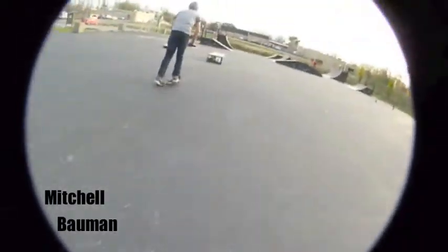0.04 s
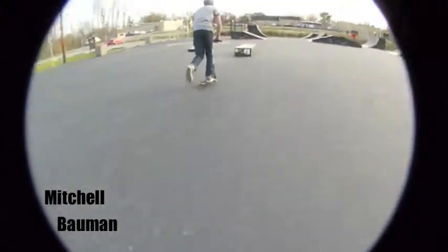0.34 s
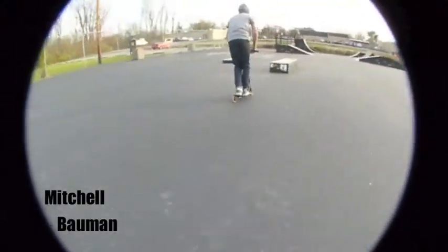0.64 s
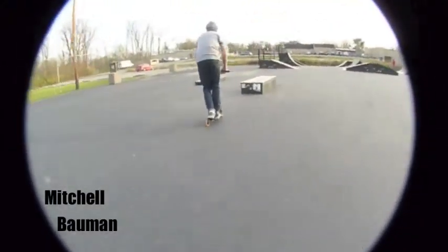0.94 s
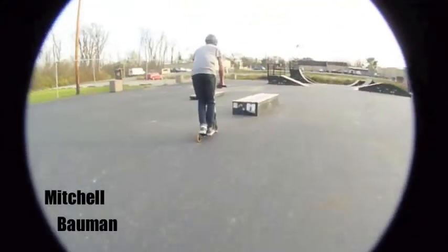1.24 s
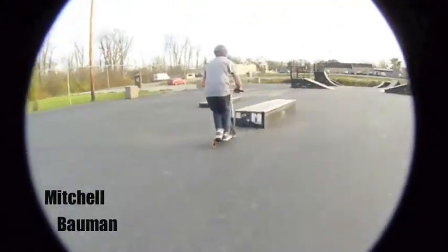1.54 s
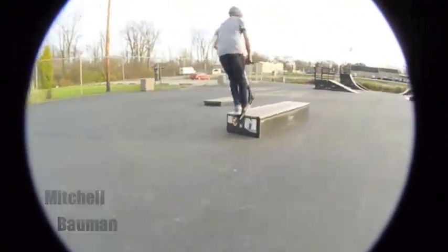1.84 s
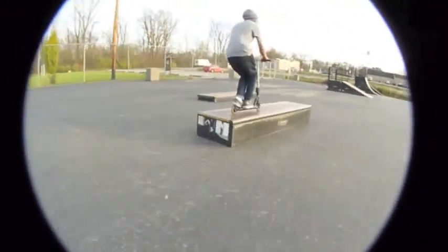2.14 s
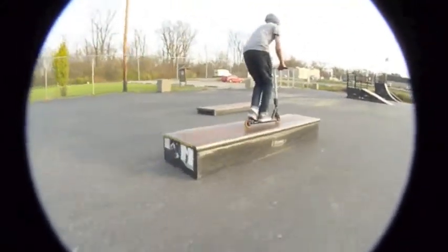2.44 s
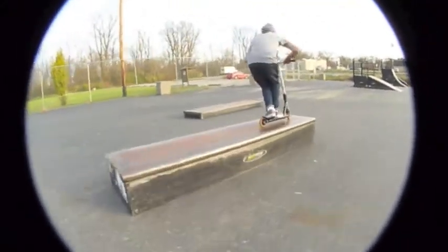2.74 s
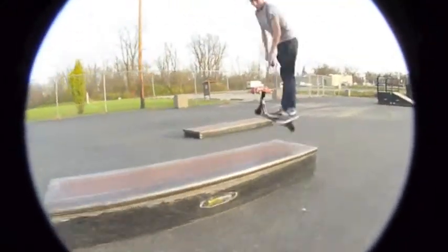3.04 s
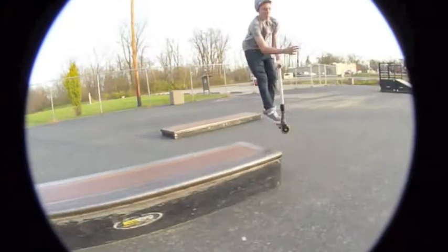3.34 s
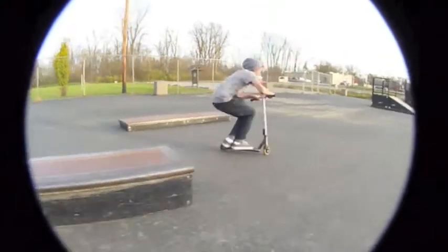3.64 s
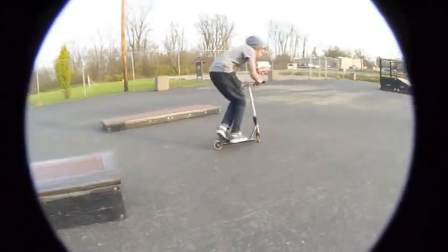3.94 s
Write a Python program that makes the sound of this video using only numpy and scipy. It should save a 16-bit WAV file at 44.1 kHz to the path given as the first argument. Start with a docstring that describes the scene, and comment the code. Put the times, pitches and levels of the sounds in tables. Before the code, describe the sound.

A stunt scooter rolls over rough pavement outdoors, with a brief scuff at the start and wheels roaring and humming close to the microphone. At about 2.1 seconds it clacks onto a hollow ledge with a metallic clang and a boom, then rattles and ticks along it, squeaking faintly near 2.9. It lands with a double clack at 3.5 seconds. Wind buffeting grows as the wheel roar fades.

```python
"""A stunt scooter rolls over a skatepark, hops onto a hollow ledge, rides along it and lands on the
ground with a double clack. Deck and frame clang at each contact, loose parts rattle, tick and squeak,
and the ledge booms under the rider's weight. The microphone rolls along behind, probably on a
skateboard: wheels close to it roar and hum on the rough surface, and wind buffets its two ports
more and more."""
import sys
import numpy as np
from scipy import signal
from scipy.fft import rfft, irfft
from scipy.io import wavfile

SR = 44100
rng = np.random.default_rng(int(sys.argv[2]) if len(sys.argv) > 2 else 0)


def unload_audio(sound):
    """Save the sound as a 16-bit wav file, at the path given as the first command line argument."""
    columns = np.transpose(np.atleast_2d(sound))
    # keep every value between -1 and 1, then stretch to whole-number steps
    steps = np.round(np.clip(columns, -1, 1) * 32767)
    wavfile.write(sys.argv[1], SR, steps.astype(np.int16))


N = 176400
TIME = np.arange(N) / SR
CUTOFF_HZ = 8300
HIT_LIKENESS, CRACK_T60_S = 0.75, 0.017


def from_db(db):
    """Decibels to gain."""
    return 10 ** (np.asarray(db) / 20)


def rms_one(x):
    """Scale to rms 1."""
    return x / np.sqrt(np.mean(x ** 2) + 1e-20)


def in_time(rows):
    """Each column of a curve, at every sample."""
    times_s, *columns = np.transpose(rows)
    return [np.interp(TIME, times_s, column) for column in columns]


def panned(pan_db):
    """Constant-power gains; pan is left minus right."""
    gains = from_db(np.array([[.5], [-.5]]) * pan_db)
    return gains / np.sqrt(np.mean(gains ** 2, axis=0))


def drift(rate_hz):
    """Low-passed noise; rms 1."""
    pole = np.exp(-2 * np.pi * rate_hz / SR)
    return rms_one(signal.lfilter([1], [1, -2 * pole, pole * pole], rng.standard_normal(N + SR))[SR:])


def flicker(rate_hz, depth_db):
    """A random gain; rms 1."""
    return rms_one(from_db(depth_db * np.clip(drift(rate_hz), -2, 2)))


def noise(colour, likeness, source=None):
    """Coloured stereo noise, rms 1; likeness is left-right correlation, one value or (bass, treble)."""
    hz, db = np.transpose(colour)
    f = np.maximum(np.fft.rfftfreq(N, 1 / SR), 1)
    gain = from_db(np.interp(np.log(f), np.log(hz), db)) * f ** 2 / (f ** 2 + (hz[0] / 2) ** 2)
    source = rng.standard_normal((2, N)) if source is None else source
    mid, side = rfft(source) * gain * (f < CUTOFF_HZ)
    alike = np.interp(np.log(f), np.log([100, 1000]), np.broadcast_to(likeness, 2))
    return rms_one(irfft(np.sqrt(1 + alike) * mid + np.sqrt(1 - alike) * side * [[1], [-1]], N))


def resonance(hz, width_hz):
    """A narrow noise band: a mode kept ringing by friction; rms 1."""
    phase = 2 * np.pi * np.cumsum(hz * np.ones(N)) / SR
    return rms_one(drift(width_hz) * np.cos(phase) + drift(width_hz) * np.sin(phase))


def decay(t60_s):
    """Half a second of exponential decay."""
    return from_db(-60 * TIME[:SR // 2] / t60_s)


def ring(hz, t60_s):
    """One struck mode."""
    return np.sin(2 * np.pi * hz * TIME[:SR // 2]) * decay(t60_s)


def place(events):
    """Sum (start, level, pan, sound) events into a stereo track."""
    out = np.zeros((2, N + SR))
    for start_s, db, pan_db, sound in events:
        i = int(start_s * SR)
        out[:, i:i + len(sound)] += from_db(db) * panned(pan_db) * sound
    return out[:, :N]


def park_scatter(sound, level_db=-13.5):
    """Faint reflections from the ground and the ramps."""
    tail = rng.standard_normal((2, SR // 2)) * decay(t60_s=0.16)
    tail /= np.sqrt(np.sum(tail ** 2, axis=1, keepdims=True))
    return from_db(level_db) * signal.fftconvolve(sound, tail, axes=1)[:, :N]


# Each row: time in seconds, relative level in dB, pan in dB.
RUMBLE = [(0, -32, -8), (.3, -43, -1.5), (.7, -38, 0), (.95, -33.5, 0.5), (1.2, -32.5, -5.5),
          (1.55, -34, -3), (1.82, -34.5, -8.5), (1.95, -28.5, -7.5), (2.1, -36, -2.5), (2.35, -26.5, -9),
          (2.6, -30.5, -18), (2.75, -27.5, -6), (2.92, -27, -5), (3.1, -28.5, -2), (3.25, -31.5, 11),
          (3.4, -27, 2.5), (3.57, -35.5, 4.5), (3.7, -28, 4.5), (4, -33, 4)]
# Each row: frequency in Hz, relative density in dB.
RUMBLE_COLOUR = [(20, -13), (35, -2), (60, 4.5), (100, 6), (150, 4), (250, -2.5), (600, -62)]


def wind_rumble(gain_db=1):
    """Wind makes a deep, lumpy rumble."""
    level_db, pan_db = in_time(RUMBLE)
    rumble = noise(RUMBLE_COLOUR, likeness=0.45) * flicker(25, depth_db=2.5)
    return from_db(level_db + gain_db) * panned(pan_db) * rumble


# Each row: time in seconds, relative level in dB, pan in dB.
BUFFET = [(0, -31.5, -9), (.1, -57, -2), (.3, -74, -2), (.65, -45.5, -2), (.78, -37.5, -3.5),
          (1.1, -40, -7.5), (1.6, -34, -7), (1.85, -39, -4), (2.3, -34.5, -6), (2.45, -26, -5.5),
          (2.6, -34, -4.5), (3.07, -30, -4), (3.14, -23, -5), (3.2, -24.5, 3), (3.26, -25.5, 2),
          (3.37, -24.5, 1.5), (3.51, -22.5, 2.5), (3.56, -32.5, 8), (3.61, -27, 2.5), (3.67, -25, 6),
          (3.73, -24.5, 1), (3.82, -22, -0.5), (3.89, -27, 2), (4, -21.5, -0.5)]
# Each row: frequency in Hz, relative density in dB.
BUFFET_COLOUR = [(60, -17.5), (130, -6), (190, -1.5), (280, -2.5), (450, -6), (700, -14), (1000, -20.5),
                 (1600, -28), (2400, -39.5), (4000, -51.5), (7500, -78)]


def wind_buffeting(gain_db=2, pops_per_s=500, pop_spread_db=5, pop_share=0.49):
    """Turbulence: uneven pops on smooth noise, with separate eddies at each port."""
    level_db, pan_db = in_time(BUFFET)
    eddies = np.array([flicker(25, depth_db=2.4) for port in range(2)])
    sizes = from_db(pop_spread_db * np.minimum(rng.exponential(1, (2, N)), 3.5))
    signs = rng.choice([-1, 1], (2, N))
    pops = rms_one(sizes * signs * (rng.random((2, N)) < pops_per_s / SR))
    turbulence = np.sqrt(pop_share) * pops + np.sqrt(1 - pop_share) * rng.standard_normal((2, N))
    buffet = noise(BUFFET_COLOUR, likeness=(0.71, -0.3), source=turbulence)
    return from_db(level_db + gain_db) * panned(pan_db) * buffet * eddies


# Each row: start in seconds, level in dB, pan in dB.
BUMPS = [(1.574, -10.5, -12), (1.616, -12, -11), (1.719, -10.5, -12), (2.858, -10.5, -8), (3.1413, -6, 5),
         (3.173, -9.5, -22), (3.302, -8.5, 19), (3.482, -15.5, 17), (3.752, -15, -6.5), (3.847, -12.5, 1),
         (3.875, -10, 16)]


def wind_bumps():
    """Single gusts bump the ports."""
    return place((s, db, pan, ring(hz=248, t60_s=0.025)) for s, db, pan in BUMPS)


# Each row: time in seconds, relative level in dB.
ROAR = [(0, -38), (.3, -37), (.9, -36.5), (1.2, -37), (1.42, -38), (1.7, -38.5), (2.05, -40.5), (2.3, -40),
        (2.5, -41), (2.8, -43), (3.2, -46), (4, -58)]
# Each row: frequency in Hz, relative density in dB.
ROAR_COLOUR = [(60, 2), (250, 3), (600, 1), (900, 0), (1150, 0.5), (1500, -4), (1700, -9.5), (2000, -13.5),
               (2400, -25.5), (3000, -25), (4200, -37.5), (6000, -34.5), (7500, -47.5)]
# Each row: time in seconds, level in dB, pitch in Hz.
WHEEL_HUM = [(0, -41, 702.3), (.3, -39.5, 720), (.42, -34.5, 734), (.6, -37, 745), (.8, -44.5, 720),
             (1.05, -41, 770), (1.5, -40, 770), (1.65, -42, 759), (2.2, -44.5, 717), (4, -67, 711)]


def near_wheels(roar_gain_db=2.5):
    """Wheels close to the microphone roar on the grit and hum at their own resonance."""
    roar_db, = in_time(ROAR)
    hum_db, hum_hz = in_time(WHEEL_HUM)
    roar = noise(ROAR_COLOUR, likeness=0.98) * flicker(48, depth_db=1.17)
    hum = resonance(hum_hz, width_hz=62)
    return from_db(roar_db + roar_gain_db) * roar + from_db(hum_db) * hum


# Each row: time in seconds, level in dB.
SCUFF = [(0, -44), (.08, -41), (.14, -45.5), (.22, -58.5), (.4, -69.5), (.95, -76), (.995, -54),
         (1.08, -73.5), (2.85, -79), (2.9, -60.5), (3.15, -67.5), (3.2, -77), (3.4, -65), (3.55, -77)]
# Each row: frequency in Hz, relative density in dB.
SCUFF_COLOUR = [(2000, -2), (3200, -14), (4000, -3.5), (5000, -4.5), (5900, -3), (6700, -5.5), (7500, -23)]


def scuffing():
    """Bright friction hiss, from the push-off to the scrape off the ledge."""
    level_db, = in_time(SCUFF)
    hiss = noise(SCUFF_COLOUR, HIT_LIKENESS) * flicker(120, depth_db=1.5)
    return from_db(level_db) * panned(pan_db=-6) * hiss


# Each row: start in seconds, length in seconds, pitch in Hz, level in dB.
SQUEAKS = [(0.366, 0.026, 3780, -51.5), (2.889, 0.0098, 4010, -42.5), (2.895, .09, 4390, -58.5),
           (2.905, 0.028, 6630, -61), (3.005, 0.037, 5980, -60), (3.051, 0.025, 6100, -55)]


def squeaks(purity=0.08):
    """Scratchy stick-slip squeaks; longer ones are purer."""
    stick_slip = flicker(83, depth_db=3)
    out = np.zeros(N)
    for start_s, length_s, hz, db in SQUEAKS:
        progress = np.clip((TIME - start_s) / length_s, 0, 1)
        swell = np.sqrt(np.abs(np.sin(np.pi * progress)))
        out += from_db(db) * swell * stick_slip * resonance(hz, width_hz=1 / (purity * length_s))
    return out


# Each row: time in seconds, level in dB.
RATTLE = [(0, -55), (2.1, -58.5), (2.18, -40.5), (2.23, -52.5), (2.42, -56), (2.48, -51), (2.56, -62),
          (3.1, -65.5), (3.14, -60), (3.22, -70), (3.3, -57), (3.42, -61.5), (3.52, -68), (3.59, -50),
          (3.65, -52), (3.73, -70), (4, -61)]
# Each row: frequency in Hz, relative density in dB.
RATTLE_COLOUR = [(500, -5), (1300, -10), (2000, 3), (2800, -3), (3800, -3.5), (5000, -8), (6000, -9.5),
                 (7500, -28.5)]


def frame_rattle():
    """Grit and rattling in the frame."""
    level_db, = in_time(RATTLE)
    return from_db(level_db) * noise(RATTLE_COLOUR, likeness=0.39) * flicker(160, depth_db=3)


# Each row: start in seconds, level in dB, pan in dB, bright share from 0 to 1.
TICKS = [(0.246, -41.5, 1, 0.85), (0.625, -30, -3, 1), (0.631, -36.5, 7, 1), (2.306, -29, -15, 0.64),
         (2.463, -32, 1, 0), (2.519, -42.5, -1, 0), (2.61, -48.5, -14, .8), (2.709, -50, 2, 0.7),
         (2.89, -46, -6, 0.94), (3.139, -40.5, -7, 0.5), (3.284, -41.5, 1, 0.04), (3.301, -44, -10, 0.03),
         (3.346, -41, -3, 0), (3.40, -39.5, 0, 0.46), (3.776, -40.5, -1, 0)]
# Each row: frequency in Hz, relative density in dB.
TICK_COLOUR = [(800, -17.5), (2000, -15), (3000, -13.5), (4000, -4), (5800, 6), (7500, -15)]


def ticks():
    """Loose parts tick, each a blend of a bright and a dull noise burst."""
    bright = place((s, db, pan, share * decay(t60_s=0.027)) for s, db, pan, share in TICKS)
    dull = place((s, db, pan, (1 - share) * decay(CRACK_T60_S)) for s, db, pan, share in TICKS)
    return bright * noise(TICK_COLOUR, HIT_LIKENESS) + dull * noise(RATTLE_COLOUR, HIT_LIKENESS)


# Each row: frequency in Hz, relative level in dB, T60 in seconds.
LEDGE_MODES = [(158.2, 0, 0.31), (175, -4, 0.13), (204.8, -4, 0.28), (287, -6.5, 0.19), (420, -13, 0.033)]
# Each row: start in seconds, relative level in dB.
WEIGHT_DROPS = [(2.0862, -15.5), (2.168, -24.5), (2.1856, -16), (2.305, -26), (2.463, -35)]


def ledge_boom(low_cut_hz=120):
    """The hollow ledge booms under the rider's weight."""
    boom = sum(from_db(db) * ring(hz, t60_s) for hz, db, t60_s in LEDGE_MODES)
    boom = signal.sosfilt(signal.butter(2, low_cut_hz, "high", fs=SR, output="sos"), boom)
    return place((s, db, 0, boom) for s, db in WEIGHT_DROPS)


# Each row: start in seconds, knock level in dB.
LANDINGS = [(2.157, -15.5), (2.3072, -17.5), (2.451, -25.5), (3.1427, -20), (3.5401, -8.5), (3.576, -12.5)]
# Each row: frequency in Hz, relative density in dB.
SMACK_COLOUR = [(300, 2), (1200, 5.5), (2200, -32)]


def wheel_landings(smack_gain_db=-13):
    """A wheel meets ledge or ground with a dead knock and a gritty smack."""
    knocks = place((s, db, 0, ring(hz=475, t60_s=0.0041)) for s, db in LANDINGS)
    smack_envelope = place((s, db + smack_gain_db, 0, decay(t60_s=0.056)) for s, db in LANDINGS)
    return knocks + smack_envelope * noise(SMACK_COLOUR, HIT_LIKENESS)


# Each row: start in seconds, crack level in dB, clang level in dB, clang pitch in Hz, pan in dB.
CLACKS = [(2.0822, -27, -24, 1410, 2), (2.0854, -20.5, -8, 1555, -1), (2.09, -30, -32, 1517, -1),
          (2.152, -27, -38, 1490, -19), (2.1694, -25.5, -18.5, 1376, -1.5), (2.1718, -29, -19.5, 2060, -9),
          (2.178, -34.5, -24, 1380, -8), (2.186, -33.5, -19.5, 1370, -3), (3.5378, -19, -48, 1580, -8),
          (3.5409, -17.5, -14, 1603, -3), (3.547, -21, -17.5, 1615, -2), (3.571, -26.5, -25.5, 1520, 4),
          (3.5772, -23.5, -24, 1605, -10), (3.588, -35, -26, 1600, -4), (3.605, -41, -28, 1650, -5)]
# Each row: frequency in Hz, relative density in dB.
CRACK_COLOUR = [(400, 0), (950, -1), (1500, 15), (2000, 1.5), (2500, 2), (3400, 1), (4200, 0), (5200, 8),
                (6000, 1), (7500, -13.5)]
# Each row: frequency in Hz, mean level against the clang in dB, T60 in seconds.
FRAME_MODES = [(1150, -19.5, 0.055), (1747, -9, 0.027), (1920, -16, 0.011), (2020, -18.5, 0.051),
               (2830, -20.5, 0.021), (3330, -19, 0.02), (4200, -28, 0.042), (4930, -46, 0.03),
               (5750, -25, 0.046), (6850, -30.5, 0.03)]


def clacks(mode_spread_db=2.07):
    """Wheels and deck strike: a short crack and a damped clang of deck and frame."""
    crack_envelope = place((s, db, pan, decay(CRACK_T60_S)) for s, db, _, _, pan in CLACKS)
    cracks = crack_envelope * noise(CRACK_COLOUR, HIT_LIKENESS)
    clangs = []
    for start_s, _, clang_db, clang_hz, pan_db in CLACKS:
        clang = ring(clang_hz, t60_s=0.022)
        for hz, db, t60_s in FRAME_MODES:
            gain = from_db(db + rng.normal(0, mode_spread_db)) * rng.choice([-1, 1])
            clang += gain * ring(hz, t60_s)
        clangs.append((start_s, clang_db, pan_db, clang))
    return cracks + place(clangs)


def scene():
    """Scooter and ledge in the open air, over near wheels and wind."""
    scooter = clacks() + ticks() + squeaks() + scuffing()
    ride = scooter + park_scatter(scooter) + ledge_boom() + wheel_landings()
    return ride + near_wheels() + frame_rattle() + wind_rumble() + wind_buffeting() + wind_bumps()


# Each row: centre in Hz, width in Hz.
HOUSING_NOTCHES = [(2600, 506), (4600, 560), (5430, 360)]


def record(dry, low_cut_hz=43):
    """The microphone housing cuts three narrow dips; deep bass and top are cut off."""
    for hz, width_hz in HOUSING_NOTCHES:
        dry = signal.lfilter(*signal.iirnotch(hz, hz / width_hz, fs=SR), dry)
    dry = signal.sosfilt(signal.butter(2, low_cut_hz, "high", fs=SR, output="sos"), dry)
    return signal.sosfilt(signal.cheby2(18, 72, CUTOFF_HZ, fs=SR, output="sos"), dry)


dry = scene()
out = record(dry)
unload_audio(out)
```